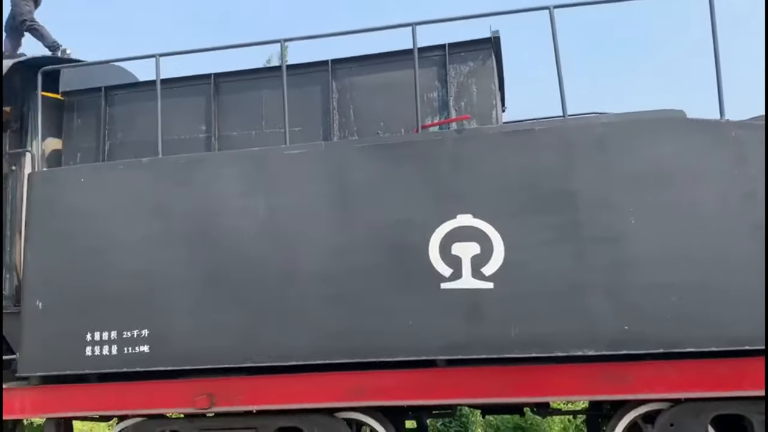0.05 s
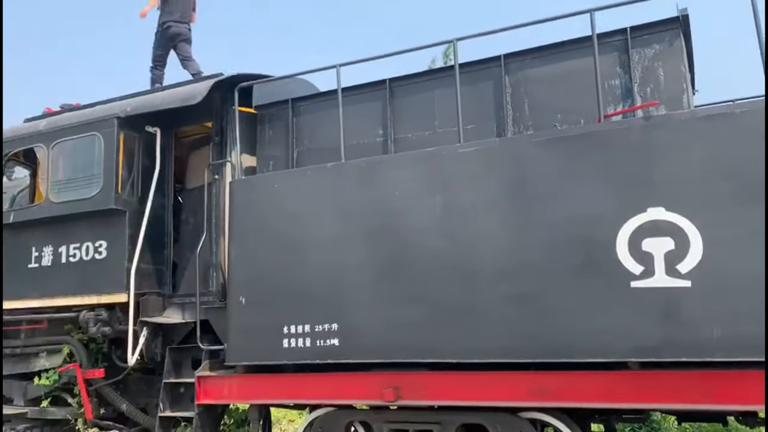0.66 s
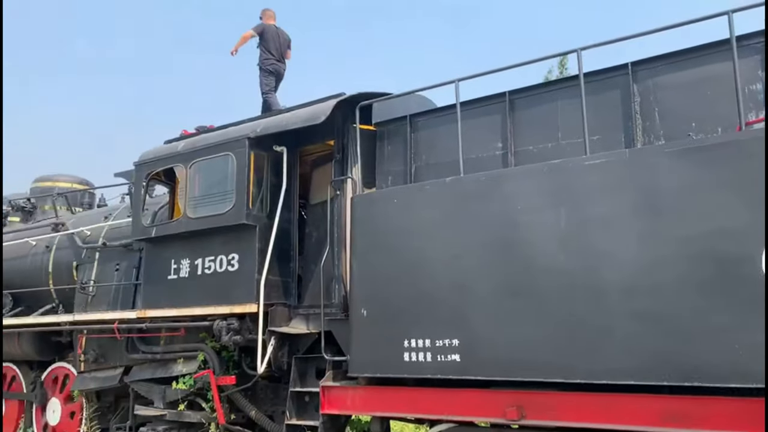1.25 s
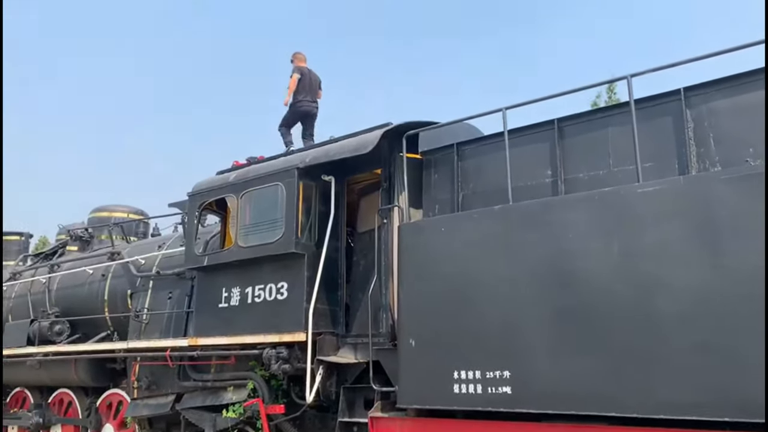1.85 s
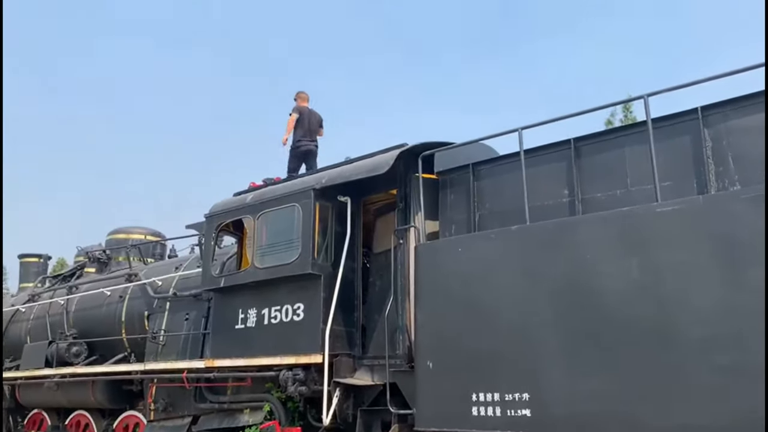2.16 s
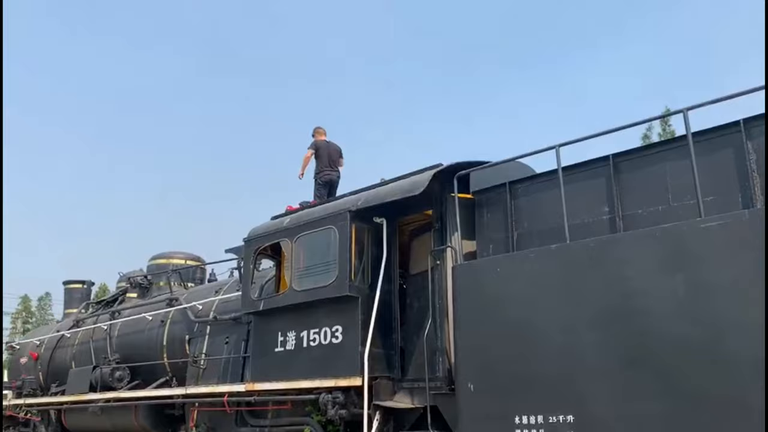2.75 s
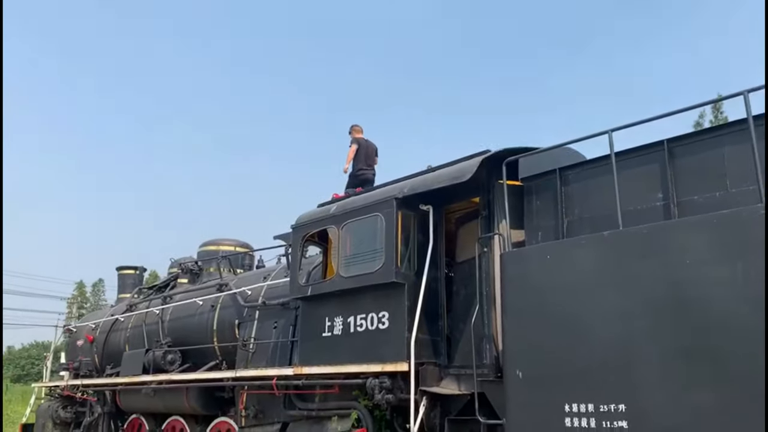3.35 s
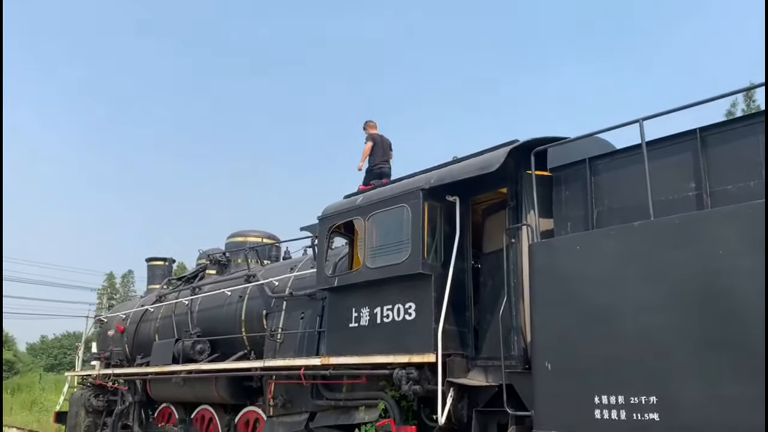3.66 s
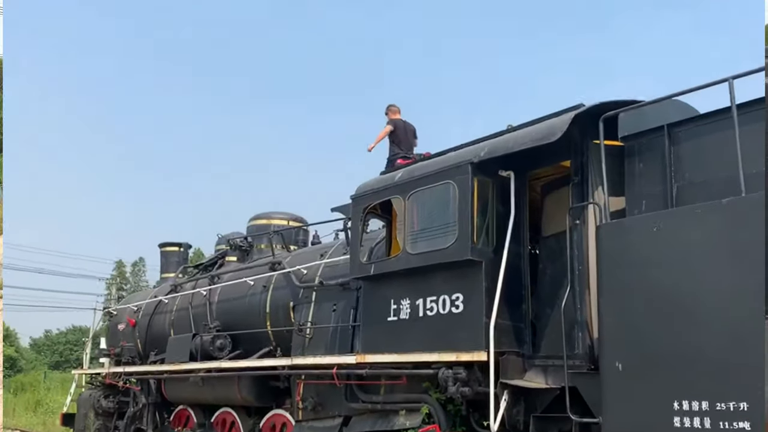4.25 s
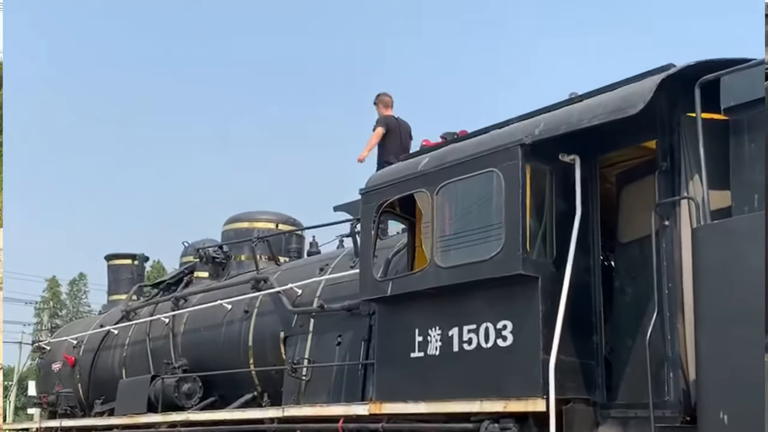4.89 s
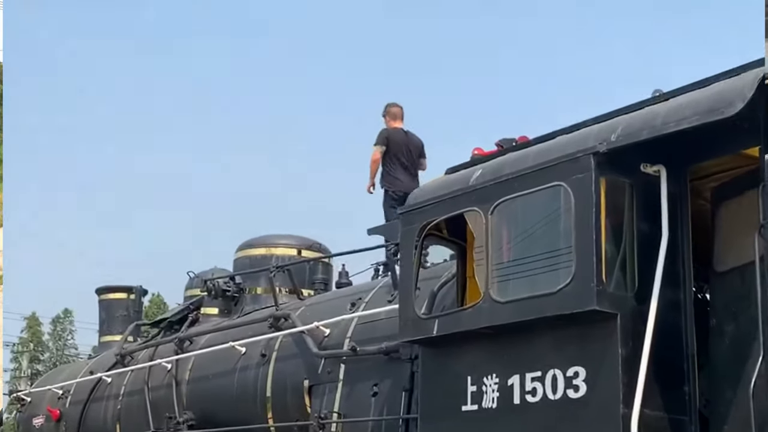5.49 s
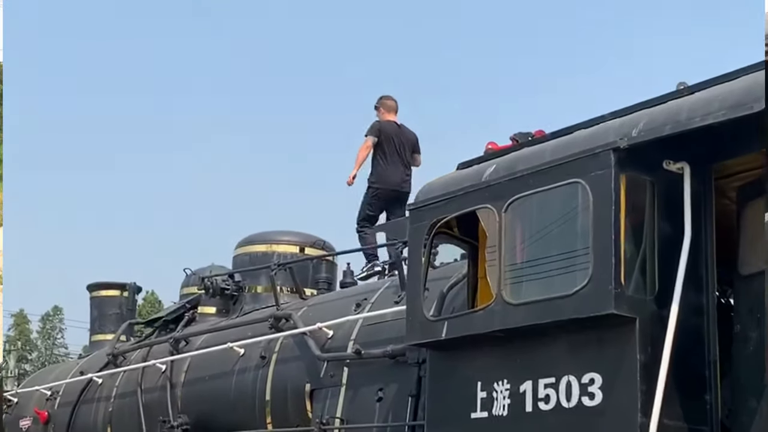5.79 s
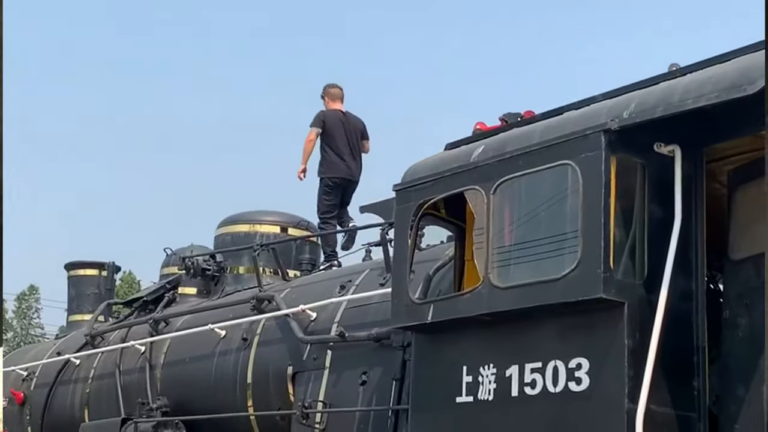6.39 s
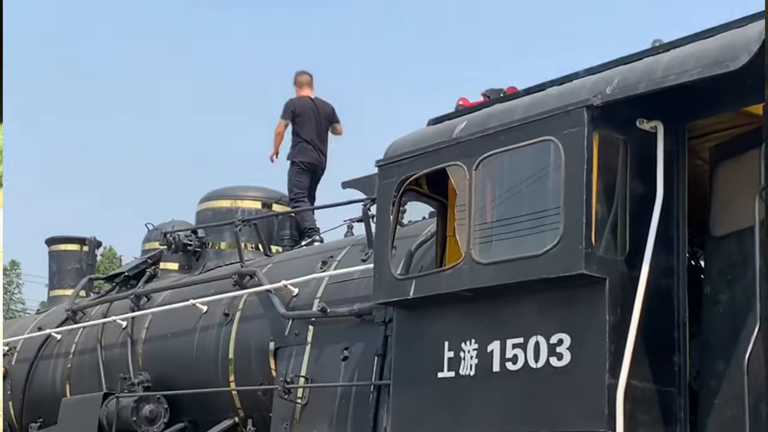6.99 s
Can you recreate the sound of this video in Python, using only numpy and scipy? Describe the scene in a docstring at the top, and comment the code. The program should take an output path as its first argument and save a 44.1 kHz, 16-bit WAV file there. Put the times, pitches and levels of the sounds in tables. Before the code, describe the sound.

Outdoors in calm air, someone walks on a locomotive's steel roof with dull, soft steps. The panel gives a loud, ringing bang, a tiny clink follows, and then comes a second bang with a clatter and heavy thuds. Wind then sets in abruptly, rumbling unevenly over the microphone to the end. Through it come scattered sharp clicks, one firm step with a short metal clank, and a faint rise of far traffic.

```python
"""Soft footsteps thump over murmuring air: a man walks on the steel cab roof of a parked steam locomotive.
Twice the sheet booms and rattles under his weight, the second time with two falling thuds. A little past half
way the scene changes: gusts buffet the microphone and a thin whine sounds. He steps down on to the boiler,
where his shoe clanks on a fitting, and far traffic swells at the end."""
import sys
import numpy as np
from scipy import signal
from scipy.fft import rfft, irfft, next_fast_len
from scipy.io import wavfile
from scipy.ndimage import uniform_filter1d, map_coordinates

SR = 44100
rng = np.random.default_rng(int(sys.argv[2]) if len(sys.argv) > 2 else 0)


def file_out(sig):
    """Save sig as 16-bit WAV at sys.argv[1]."""
    # one column per channel
    cols = np.atleast_2d(sig).T
    # limit, then scale
    lim = np.clip(cols, -1, 1)
    pcm = np.round(lim * 32767).astype(np.int16)
    wavfile.write(sys.argv[1], SR, pcm)


N = 314542
T = np.arange(N) / SR
FFT_SIZE = next_fast_len(N, real=True)
HZ = np.maximum(np.arange(FFT_SIZE // 2 + 1) * SR / FFT_SIZE, 1)
SCENE_CHANGE_S = 4.26

# heavy steps on the roof (time [s], level [dB], rise [s], time under load [s], bass [dB], treble [dB])
FOOTFALLS = [(2.2327, -18, 0.021, 0.034, -4, 0), (2.349, -20.5, 0.041, 0.012, -26, -12.5),
             (3.7116, -20, 0.013, 0.049, -4, 1), (3.764, -24, 0.0082, 0.068, -26, 2.5),
             (3.849, -25, 0.0066, 0.071, -25, -8.5)]
# where the roof and its loose seams ring (frequency [Hz], width [Hz], boost [dB])
ROOF_PEAKS = [(78, 44, 8), (129, 28, 4), (235, 19, -13.5), (320, 27, 3.5), (414, 16, -2), (500, 95, 3.5),
              (625, 51, 5), (740, 18, -4), (914, 4.8, 3), (980, 15, 3), (1040, 18, 0), (2200, 290, 12),
              (3180, 790, 3.5), (7040, 64, 8), (7600, 25, 0)]
SEAM_PEAKS = [(1900, 64, 16), (2130, 54, 9.5), (3620, 110, 9), (4080, 200, 8), (4500, 70, 7),
              (4720, 70, 14)]
# dips in the treble of the roof and the calm air (frequency [Hz], width [Hz], change [dB])
TREBLE_DIPS = [(8550, 650, -14), (11850, 550, -22)]
# swinging roof panels (time [s], pitch [Hz], level [dB], time to fade by 60 dB or "t60" [s])
BOOMS = [(2.2377, 72.5, -9.5, 0.43), (2.24, 101.7, -23, 0.77), (2.242, 131.4, -22.5, 0.61),
         (2.245, 883, -33.5, 0.45), (2.249, 1016, -36.5, 0.5), (2.245, 2000, -36, 0.16),
         (2.247, 2100, -43, 0.3), (2.248, 2799, -42, 0.15), (2.25, 2910, -51, 0.3),
         (2.246, 3752, -53, 0.22), (2.25, 3960, -43, 0.19), (2.262, 161.7, -28, 0.51),
         (2.268, 506, -26.5, 0.31), (2.278, 276, -20.5, 0.18), (2.31, 384, -24, 0.15),
         (2.355, 298.7, -27, 0.83), (2.37, 240, -25.5, 0.52), (3.723, 215, -17.5, 0.26),
         (3.765, 528.6, -20.5, 0.25), (3.847, 269, -17, 0.12), (3.92, 1047, -38, 0.24),
         (3.992, 333, -37, 0.35)]
# the sheet hits its frame (time [s], level [dB])
SLAPS = [(2.2405, -32), (2.289, -38), (3.715, -29), (3.736, -26), (3.776, -19), (3.802, -32)]
# the seams buzz (peak time [s], half length [s], level [dB])
RATTLES = [(2.26, 0.024, -45.5), (2.39, 0.051, -48), (3.727, 0.0093, -39), (3.78, 0.079, -57)]
# a panel snaps through (time [s], level [dB], length [s], glide time [s], pitch it falls towards [Hz])
SNAPS = [(3.8142, -8.5, 0.037, 0.000504, 21), (3.919, -8, 0.026, 0.000448, 37.04)]
# soft steps and bumps (time [s], level [dB], pitch [Hz], t60 [s], rise [s])
THUMPS = [(0.044, -33.5, 163, 0.25, 0.006), (0.25, -28.5, 71, 0.33, 0.01), (.528, -24, 79, 0.22, 0.012),
          (0.726, -30, 112, 0.17, 0.005), (1.104, -16, 67.6, 0.13, 0.016), (1.12, -32, 127, 0.12, 0.011),
          (1.266, -6, 80, 0.071, 0.014), (1.28, -26.5, 138.4, 0.11, 0.008), (1.354, -24, 110, 0.1, 0.0096),
          (3.727, -13, 95, 0.12, 0.006), (3.768, -8, 131, 0.071, 0.005), (3.965, -33, 135, 0.14, 0.008),
          (4.037, -19.5, 276, 0.039, 0.0014), (4.15, -19, 95, 0.077, 0.0087),
          (5.731, -22.5, 156, 0.059, 0.0054), (6.2484, 1, 79, 0.045, 0.0079),
          (6.254, -11.5, 201, 0.065, 0.002), (6.3716, -7, 137, 0.036, 0.003)]
# blows on the boiler fitting and a small steel piece (time [s], level [dB], brightness [dB per octave])
CLANK_BLOWS = [(6.2556, -24.5, -1.5), (6.2595, -46, -1), (6.276, -41, 4)]
CLINK_BLOWS = [(3.1222, -48.5, 1), (3.1295, -50, 3.5)]
# the tones each of them rings with (pitch [Hz], level [dB], t60 [s])
CLANK_TONES = [(517, -1, 0.13), (690, -7, 0.034), (990, 2, 0.043), (1127, -6, 0.078), (1270, -10, 0.041),
               (1460, -15, 0.028), (1740, -16, 0.05), (2043, 4.5, 0.029), (2170, 4.5, 0.021),
               (2330, -10, 0.03), (2620, -9, 0.022), (3000, -24, 0.022)]
CLINK_TONES = [(3680, 0, 0.026), (3800, 1, 0.042), (4425, -7, 0.058), (4550, -9, 0.056), (5932, -18, 0.035),
               (6250, -18, 0.03)]
# small clicks (time [s], level [dB], frequency [Hz], width [Hz], t60 [s])
TICKS = [(.198, -64.5, 4500, 3500, .02), (0.345, -52, 4700, 3000, 0.035), (1.595, -70, 10000, 6000, .2),
         (3.024, -52, 2800, 5000, 0.038), (3.05, -55, 5640, 4000, 0.029),
         (3.1215, -44.5, 4970, 4000, 0.012), (3.123, -42, 4150, 1400, 0.051), (3.21, -65, 5000, 4000, .05),
         (4.03, -57.5, 3600, 2000, 0.22), (4.2612, -46.5, 2160, 14200, 0.0044),
         (4.406, -47.5, 2600, 1500, 0.21), (4.408, -57, 9000, 8000, 0.03), (4.478, -59, 11000, 5000, 0.05),
         (4.53, -62, 11500, 5000, 0.04), (4.563, -59, 10500, 4500, 0.05), (5.06, -63, 10300, 3500, 0.05),
         (5.356, -47, 3880, 6000, 0.023), (5.731, -32.5, 534, 450, 0.079), (5.792, -47.5, 3000, 3500, .04),
         (5.848, -52, 7760, 8000, 0.037), (6.0247, -41.5, 5300, 11000, 0.015),
         (6.193, -57, 8000, 6000, .05), (6.25, -41, 2200, 3000, 0.03), (6.255, -47, 6440, 8000, 0.035),
         (6.256, -33.5, 1780, 1900, 0.054), (6.3192, -38, 1070, 1380, 0.017), (6.444, -62, 3900, 4000, .02),
         (6.767, -45, 4000, 7000, .03), (6.81, -44, 3100, 3500, .03), (6.927, -48, 5000, 9000, 0.02),
         (7.029, -48, 4500, 8000, .02)]
# thin rasps and a faint high trill (time [s], length [s], level [dB], frequency [Hz], width [Hz])
RASPS = [(1.302, 0.092, -59.5, 1150, 1280), (0.63, 0.087, -72, 4080, 900), (4.397, 0.21, -78, 10300, 1500),
         (4.528, 0.125, -56, 2900, 200), (5.35, 0.39, -65, 9200, 1500), (6.077, 0.16, -68, 7700, 3000)]
# gusts on the microphone (peak time [s], half length [s], level [dB])
GUSTS = [(4.402, 0.054, -18), (4.566, 0.076, -14.5), (4.662, 0.064, -17.5), (4.933, 0.1, -19),
         (5.064, 0.025, -19), (5.487, 0.03, -24.5), (5.796, 0.017, -16), (5.914, 0.022, -20),
         (6.294, 0.04, -28), (6.496, 0.01, -22), (6.646, 0.019, -20.5), (6.85, 0.074, -22.5),
         (7.126, 0.054, -15)]
# the side they come from (time [s], left minus right [dB])
GUST_SIDE = [(4.3, 6), (4.7, .3), (5.75, 1), (6.25, -2.5), (6.8, -3.5)]
# how loud the air's murmur and low drone are (time [s], level [dB])
MURMUR_LEVEL = [(0, -55), (1.7, -52.5), (2.15, -57), (2.6, -58), (3.1, -51), (4.2, -51.5)]
DRONE_LEVEL = [(1.3, -64), (1.7, -55.5), (2.55, -45.5), (3.6, -51), (4.05, -41)]
# the whine dips briefly (time [s], half length [s], change [dB])
WHINE_DIPS = [(5.66, 0.082, -7), (6.86, 0.097, -9)]

# tone colours of the roof and the steps (frequency [Hz], relative level [dB])
SHEET_COLOUR = [(55, -1.5), (70, 6), (130, -0.5), (290, -0.5), (420, -5.5), (600, -11), (1000, -16),
                (1600, -22), (2200, -29.5), (4000, -26), (5500, -33.5), (7300, -27), (10000, -25.5),
                (14000, -33)]
SLAP_COLOUR = [(180, -18), (330, 3), (650, -5), (1200, -19), (2000, -32)]
RATTLE_COLOUR = [(2000, 7.5), (3000, 4), (4800, -2.5), (6500, -6)]
KNOCK_COLOUR = [(70, 8.5), (130, 20), (200, -5.5), (300, -7)]
# tone colours of the wind and the tyres (frequency [Hz], relative level [dB])
BUFFET_COLOUR = [(12, 10.5), (25, 0.5), (42, -8), (70, -10.5), (110, -21.5), (160, -29.5), (220, -37)]
RUSH_COLOUR = [(71, -32), (120, -6), (203, -7), (248, -3.5), (352, -13), (514, -11), (881, -19.5),
               (1220, -19.5), (3000, -34), (3900, -38), (6600, -120)]
HISS_COLOUR = [(1060, -35), (1800, -11.5), (2920, -2), (4380, -2.5), (10200, -14.5), (12000, -17.5),
               (15700, -16)]
TYRE_COLOUR = [(500, -38), (850, 9.5), (1120, -6), (1600, -22), (2250, -5), (3200, -18)]
# tone colours of the calm air (frequency [Hz], relative level [dB])
RUMBLE_COLOUR = [(22, -22), (45, 5.5), (75, -4), (120, -8), (175, -13.5)]
MURMUR_COLOUR = [(170, -16), (245, 8), (275, -39), (305, -16), (350, -4), (430, 1.5), (520, 4), (620, -3),
                 (760, -45), (1500, -26)]
DRONE_COLOUR = [(120, -3), (200, -5), (255, 4), (330, -6.5), (420, -7.5), (560, -43)]
FAR_HISS_COLOUR = [(550, -3), (800, -2.5), (1000, -5), (1350, -6), (1700, -8.5), (2300, -12), (2800, -17.5),
                   (3400, -18), (4500, -24), (5500, -31), (7600, -33), (10200, -33.5), (13500, -34.5)]


def roof(low_t60=0.79, high_t60=0.24, tail_t60=4.7):
    """Under his weight the sheet chatters on its frame, then rings on, the treble dying first."""
    peaks_db = resonances(ROOF_PEAKS) + crowded_tones(spread_db=3, spacing_hz=35.95)
    chatter = rng.standard_normal(N) * undb(wander(500))
    sheet = unit(shape(chatter, colour(SHEET_COLOUR) * undb(peaks_db) * dipped_treble()))
    octave = np.clip(np.log2(HZ / 100), 0, 7)
    out = 0
    for k, height in enumerate(np.linspace(0, 1, 8)):  # octave bands, lowest first
        # the steady weight of the body keeps each band's power even
        band = even(shape(sheet, np.maximum(1 - abs(octave - k), 0)), size=1300)
        t60 = low_t60 * (high_t60 / low_t60) ** height
        power = np.zeros(N)
        for s, db, rise_s, load_s, bass_db, treble_db in FOOTFALLS:
            span = slice(int(s * SR) - SR // 200, int(s * SR) + 2 * SR)
            age = T[span] - T[span][0]
            released = np.maximum(age - load_s, 0)
            # the hollow cab adds a longer, duller tail
            decay = fade(released, t60) + undb(-23 - 13 * height) * fade(released, tail_t60)
            # the boom comes first, the sizzle builds a little later
            swell = np.minimum(age / rise_s, 1) ** (1 + height / 2)
            gain = undb(db + bass_db * (k == 0) + treble_db * height)
            power[span] += (gain * swell * decay) ** 2
        out += band * np.sqrt(power)
    return out


def booms():
    """Heavy steps and their rebounds set the roof panels swinging, each with its own tone."""
    return sum(undb(db) * press(s, rise_s=0.0049) * ring(s, hz, t60) for s, hz, db, t60 in BOOMS)


def slaps(clap_t60=0.031, crack_t60=0.017):
    """The loose sheet slaps its frame: a hollow clap with a dry crack on top."""
    clap = noise(colour(SLAP_COLOUR))
    crack = undb(-9) * noise(bell(hz=3400, width=3200) ** 2)
    out = 0
    for s, db in SLAPS:
        slap = clap * fade(T - s, clap_t60) + crack * fade(T - s, crack_t60)
        out += undb(db) * press(s, rise_s=0.0015) * slap
    return out


def rattle(flicker_db=6):
    """Grit and loose seams buzz in uneven spurts while the sheet is bent, and the seams ring."""
    load = sum(undb(db) * hump(s, half_s) for s, half_s, db in RATTLES)
    spurts = unit(undb(flicker_db * np.tanh(wander(260))))
    return load * spurts * noise(colour(RATTLE_COLOUR) * undb(resonances(SEAM_PEAKS)))


def snaps(sweep_hz=2000):
    """A panel snaps through. High tones run faster in the sheet, so the thud falls in pitch."""
    out = 0
    for s, db, length, glide, end_hz in SNAPS:
        age = np.clip(T - s, 0, 1)
        cycles = end_hz * age + sweep_hz * glide * np.log1p(age / glide)
        envelope = press(s, rise_s=0.0013) * np.exp(-(age / length) ** 4)
        out += undb(db) * envelope * np.sin(2 * np.pi * cycles)
    return out


def steps():
    """Light steps: a soft sole gives a short thump with a dull knock."""
    knock = undb(-13) * noise(colour(KNOCK_COLOUR))
    return sum(undb(db) * press(s, rise_s) * (ring(s, hz, t60) + knock * fade(T - s, t60))
               for s, db, hz, t60, rise_s in THUMPS)


def clank():
    """A shoe strikes a steel fitting on the boiler, chatters and bounces once; light blows are brighter."""
    return pan(side_db=6) * strike(CLANK_BLOWS, CLANK_TONES, rough_s=0.0012)


def clink():
    """A small loose piece of steel gives a crisp, high clink."""
    return strike(CLINK_BLOWS, CLINK_TONES, rough_s=0.00058)


def strike(blows, tones, rough_s):
    """Struck steel rings; its surface is rough, so the tones start slightly out of step."""
    out = 0
    for s, blow_db, bright_db in blows:
        contact = press(s, rise_s=rough_s)
        for hz, db, t60 in tones:
            lag = rng.uniform(0, rough_s)
            gain = undb(blow_db + db + bright_db * np.log2(hz / 1000))
            out += gain * contact * ring(s + lag, hz, t60)
    return out


def ticks(rise_s=0.00044):
    """Small clicks: bursts of noise that start sharply and die away."""
    return sum(undb(db) * noise(bell(hz, width) ** 2) * fade(T - s, t60) * np.clip((T - s) / rise_s, 0, 1)
               for s, db, hz, width, t60 in TICKS)


def rasps(grain_db=3):
    """Thin, grainy rasps and a faint high trill, perhaps an insect."""
    out = 0
    for s, length, db, hz, width in RASPS:
        swell = np.clip(np.minimum(T - s, s + length - T) / (0.19 * length), 0, 1)
        band = np.exp(-abs((HZ - hz) / width) ** 3)
        out += undb(db + grain_db * wander(120)) * swell * noise(band)
    return out


def wind(breeze_db=-24.5):
    """Gusts rise above the breeze, buffet the microphone and lift the rush and hiss of the air."""
    gust_power = sum(undb(db - breeze_db) ** 2 * hump(s, half_s) for s, half_s, db in GUSTS)
    gust_db = 10 * np.log10(1 + gust_power)
    eddies = even(wide_noise(colour(BUFFET_COLOUR), width_db=-3.5, flutter_db=0), size=5000)
    buffet = undb(breeze_db + gust_db) * pan(curve(GUST_SIDE)) * eddies
    rush = undb(-40 + 0.094 * gust_db) * wide_noise(colour(RUSH_COLOUR), width_db=-10, flutter_db=1.2)
    hiss = undb(-61 + 0.1 * gust_db) * wide_noise(colour(HISS_COLOUR), width_db=-3, flutter_db=0.86)
    return (buffet + rush + hiss) * (T >= SCENE_CHANGE_S)


def traffic(start_s=5.375, swell_s=1.33, rise_per_s=0.1):
    """Far traffic draws nearer: the tyres sing in two rising bands, and the treble arrives last."""
    near = np.clip((T - start_s) / swell_s, 0, 1) ** 2
    tyres = undb(-51.5) * wide_noise(colour(TYRE_COLOUR), width_db=-12, flutter_db=1)
    hiss = undb(-61) * wide_noise(bell(hz=4800, width=7500), width_db=-1.5, flutter_db=1)
    # the tread's song rises with speed, so its noise is read faster and faster
    position = np.cumsum(np.exp(rise_per_s * (T - T[-1])))
    low_song = undb(-46.5) * map_coordinates(noise(bell(hz=1140, width=260)), [position])
    high_song = undb(-57) * map_coordinates(noise(bell(hz=2300, width=300)), [position])
    return near * (tyres + low_song) + near ** 5 * (hiss + high_song)


def calm_air():
    """Until the scene changes, the air holds a low rumble, a murmur, a drone and a slowly growing far hiss."""
    rumble = undb(-41 + 2.6 * wander(21)) * noise(colour(RUMBLE_COLOUR))
    murmur = undb(curve(MURMUR_LEVEL) + 0.7 * wander(8)) * noise(colour(MURMUR_COLOUR))
    drone = undb(curve(DRONE_LEVEL)) * noise(colour(DRONE_COLOUR))
    far_hiss = undb(-59 + 0.4 * T) * restless_noise(colour(FAR_HISS_COLOUR) * dipped_treble())
    return (rumble + murmur + drone + far_hiss) * (T < SCENE_CHANGE_S)


def whine(high_hz=14100, low_hz=10201):
    """A thin whine with a faint lower tone sounds after the scene changes."""
    dips_db = sum(db * hump(s, half_s) for s, half_s, db in WHINE_DIPS)
    high = undb(-63 + dips_db) * np.sin(2 * np.pi * high_hz * T)
    low = undb(-80) * np.sin(2 * np.pi * low_hz * T)
    return (high + low) * (T >= SCENE_CHANGE_S)


def ring(s, hz, t60):
    """One struck tone that starts at time s and dies away."""
    out = np.zeros(N)
    span = slice(int(s * SR), int((s + 2 * t60) * SR))
    age = T[span] - s
    out[span] = np.sin(2 * np.pi * hz * age) * fade(age, t60)
    return out


def press(s, rise_s):
    """A contact builds up its force smoothly from time s."""
    return 1 - np.exp(-(np.maximum(T - s, 0) / rise_s) ** 2)


def fade(age, t60):
    """Silent before age 0, then falling by 60 dB every t60 seconds."""
    return (age >= 0) * np.exp(-np.log(1000) * np.clip(age / t60, 0, 10))


def hump(s, half_s):
    """A smooth rise and fall that peaks at time s."""
    return np.exp(-((T - s) / half_s) ** 2)


def curve(points):
    """Join (time, value) points with straight lines."""
    return np.interp(T, *np.transpose(points))


def colour(points):
    """Gain per frequency from (Hz, dB) points, falling steeply outside them."""
    hz, db = np.transpose(points)
    skirt = np.minimum(HZ / hz[0], 1) * np.minimum(hz[-1] / HZ, 1)
    return undb(np.interp(np.log(HZ), np.log(hz), db)) * skirt ** 4


def bell(hz, width):
    """Shape of one resonance, 1 at its centre."""
    return 1 / (1 + ((HZ / hz - hz / HZ) * hz / width) ** 2)


def resonances(table):
    """A table's peaks and dips added up, in dB at each frequency."""
    return sum(db * bell(hz, width) for hz, width, db in table)


def crowded_tones(spread_db, spacing_hz):
    """A large sheet has countless close tones: a fine random ripple in dB over frequency."""
    knots = np.arange(0, SR, spacing_hz)
    return spread_db * np.interp(HZ, knots, rng.standard_normal(N)[:len(knots)])


def dipped_treble(top_hz=14200):
    """Gain per frequency for an uneven treble: two dips and a steep top."""
    return undb(resonances(TREBLE_DIPS)) * (HZ < top_hz)


def noise(gain):
    """Noise of average level 1 with the given gain per frequency."""
    return unit(shape(rng.standard_normal(N), gain))


def wander(rate):
    """A smooth random curve of spread 1 that changes about rate times a second."""
    return noise(np.exp(-(HZ / rate) ** 2))


def wide_noise(gain, width_db, flutter_db):
    """Fluttering noise that is partly unlike at the left and right microphone openings."""
    sound = noise(gain) + undb(width_db) * noise(gain) * np.array([[1], [-1]])
    return sound * undb(flutter_db * wander(28))


def restless_noise(gain, flicker_db=2.2, rate=14, groups=5):
    """Noise whose quarter-octave bands waver in a few interleaved groups."""
    sound = noise(gain)
    quarter = 4 * np.log2(HZ)
    out = 0
    for k in range(groups):
        share = np.maximum(1 - abs((quarter - k) % groups - groups / 2), 0)
        out += shape(sound, share) * undb(flicker_db * wander(rate))
    return unit(out)


def shape(x, gain):
    """Filter with the given gain per frequency."""
    return irfft(rfft(x, FFT_SIZE) * gain, FFT_SIZE)[:N]


def even(x, size):
    """Hold the power of a noise steady over about size samples."""
    return x * np.std(x) / np.sqrt(uniform_filter1d(x ** 2, size=size) + 1e-12)


def pan(side_db):
    """Left and right gains, the left louder by side_db."""
    return undb(np.vstack([side_db, -side_db]) / 2)


def unit(x):
    """Scale to an average (rms) level of 1."""
    return x / np.sqrt(np.mean(x ** 2))


def undb(db):
    """Turn decibels into a gain."""
    return 10 ** (np.asarray(db) / 20)


def scene():
    """The locomotive stands straight ahead, the clank a little left; wind and traffic are wide."""
    heavy_steps = roof() + booms() + slaps() + rattle() + snaps()
    lighter_sounds = steps() + clank() + clink() + ticks() + rasps()
    background = calm_air() + wind() + whine() + traffic()
    return heavy_steps + lighter_sounds + background


def record(dry, top_hz=15700):
    """The phone cuts off the highest treble."""
    return signal.sosfilt(signal.ellip(12, .2, 70, top_hz, fs=SR, output="sos"), dry)


dry = scene()
out = record(dry)
file_out(out)
```